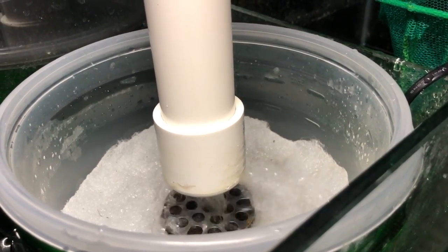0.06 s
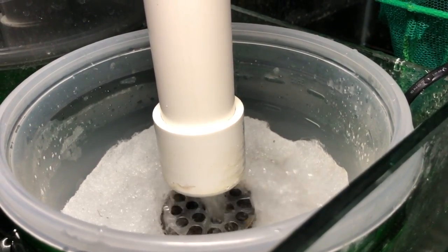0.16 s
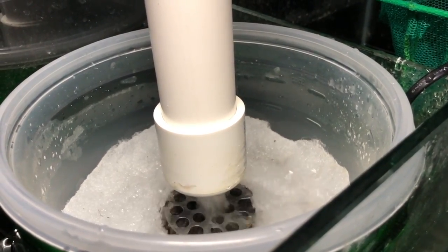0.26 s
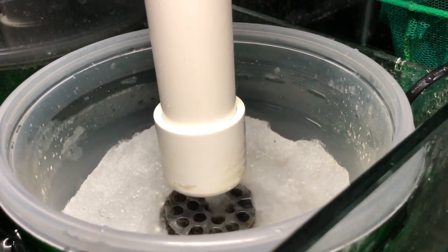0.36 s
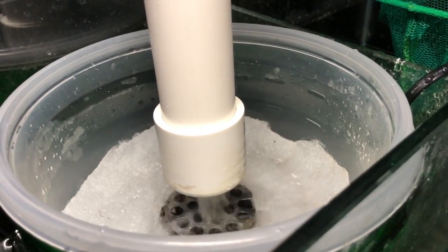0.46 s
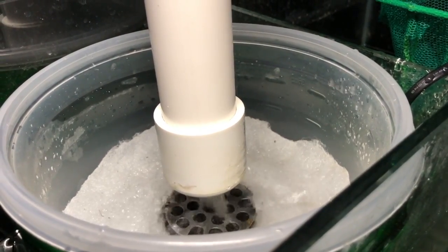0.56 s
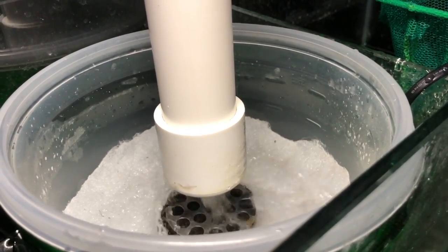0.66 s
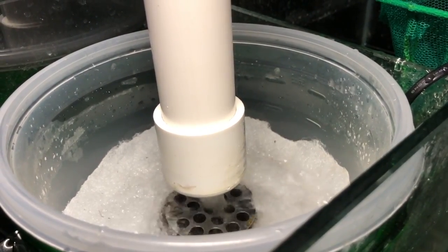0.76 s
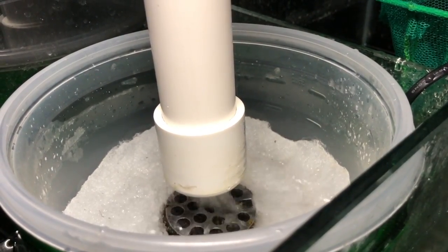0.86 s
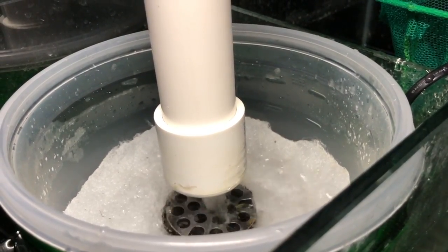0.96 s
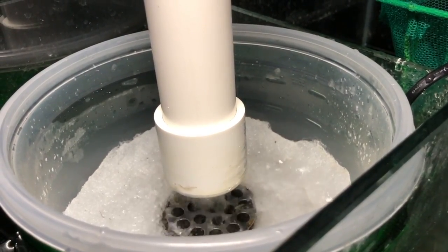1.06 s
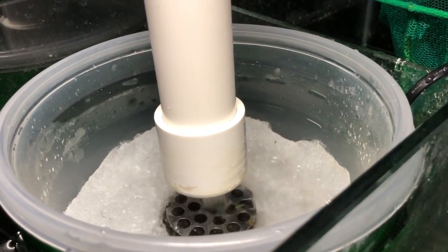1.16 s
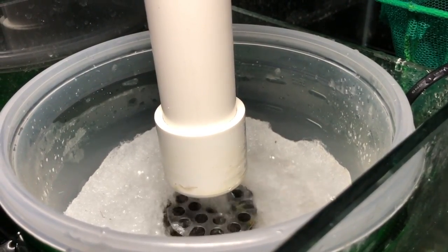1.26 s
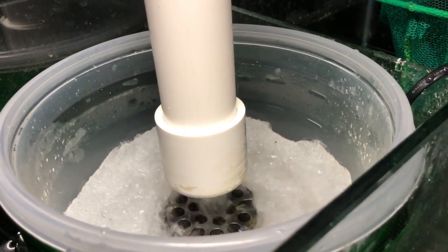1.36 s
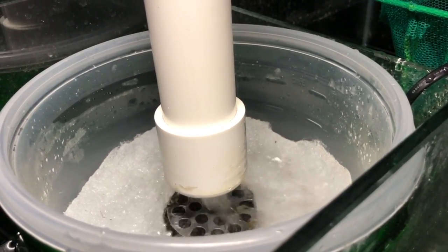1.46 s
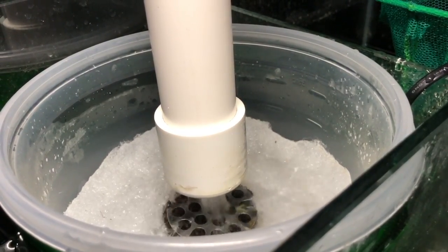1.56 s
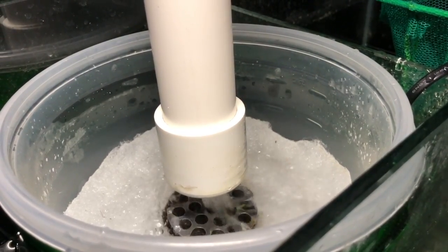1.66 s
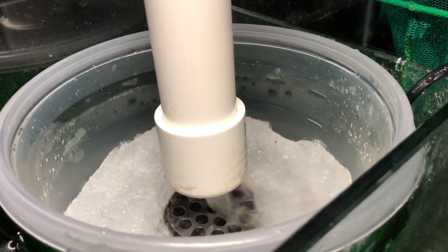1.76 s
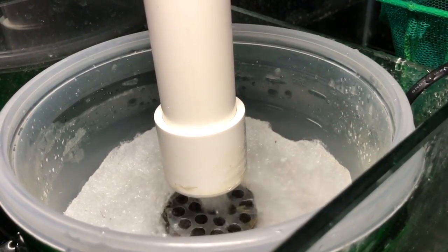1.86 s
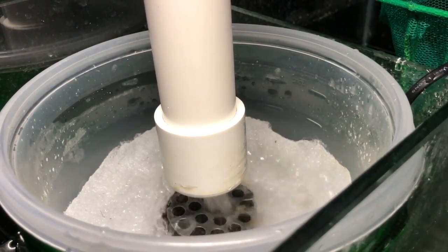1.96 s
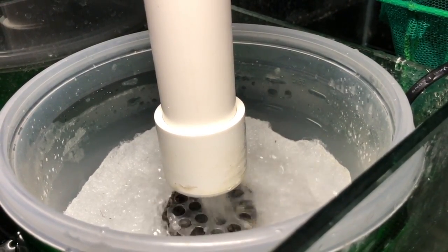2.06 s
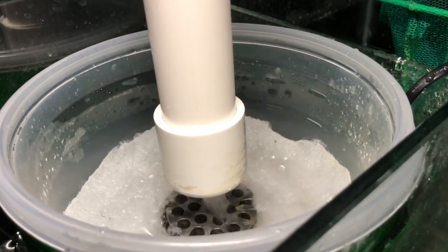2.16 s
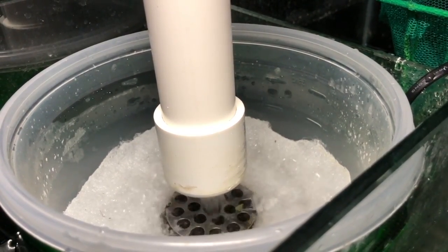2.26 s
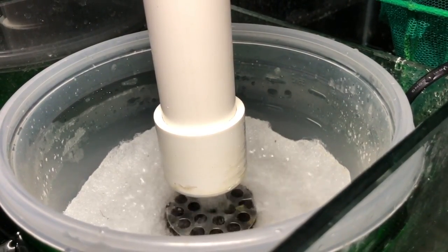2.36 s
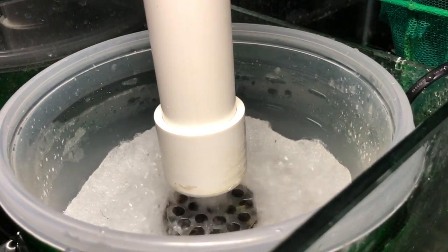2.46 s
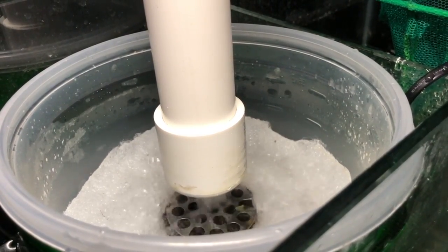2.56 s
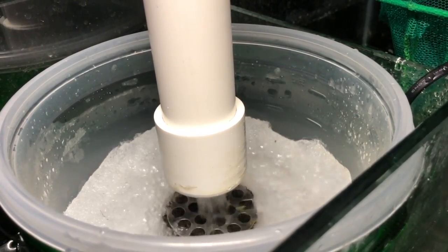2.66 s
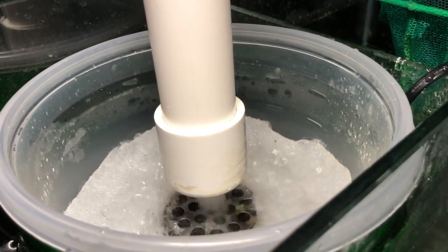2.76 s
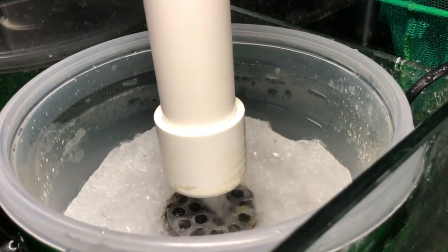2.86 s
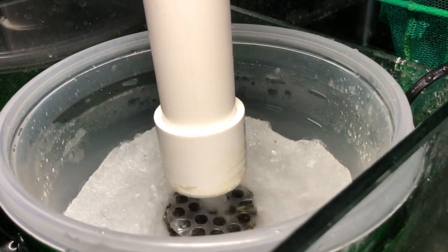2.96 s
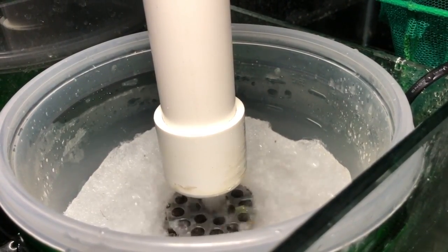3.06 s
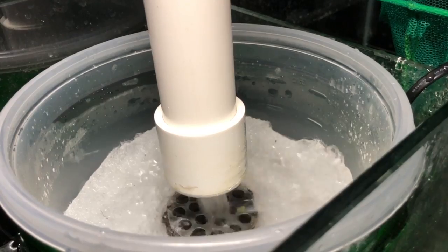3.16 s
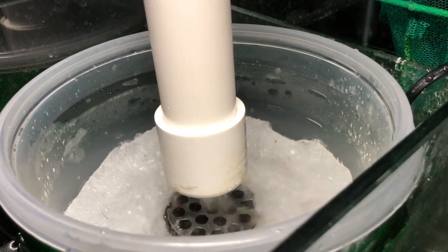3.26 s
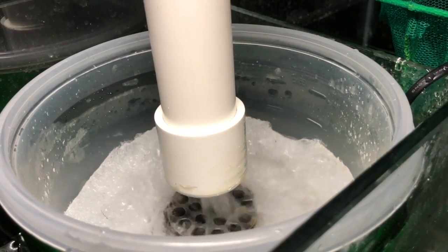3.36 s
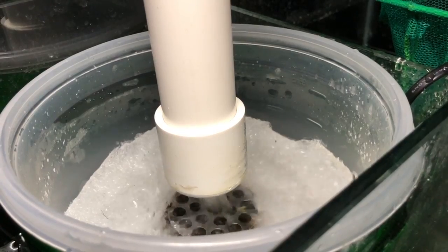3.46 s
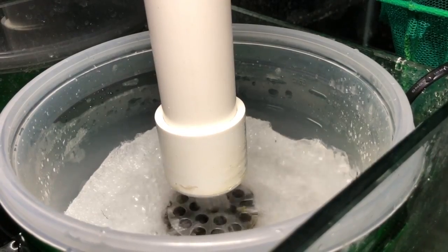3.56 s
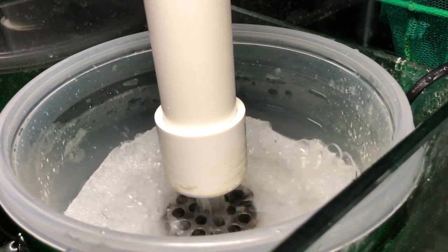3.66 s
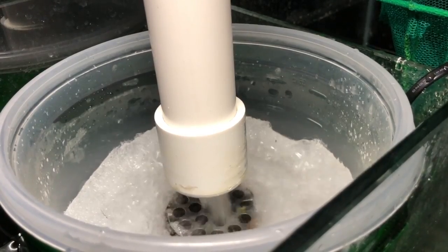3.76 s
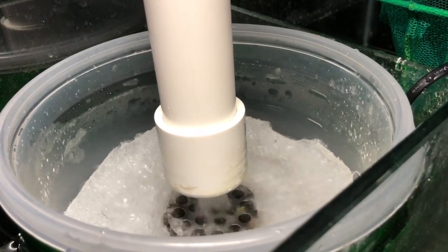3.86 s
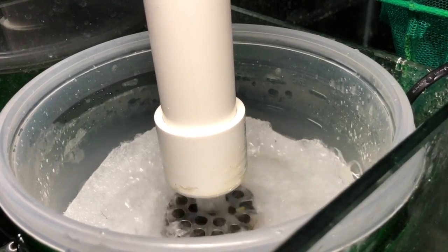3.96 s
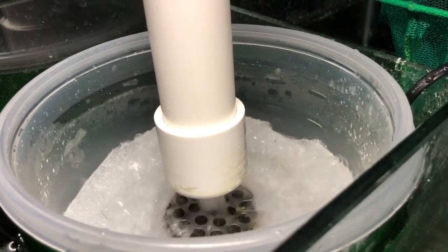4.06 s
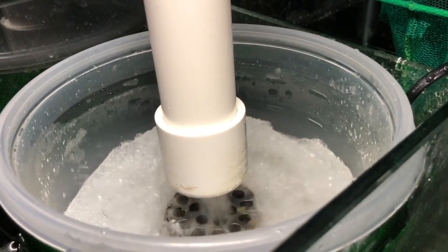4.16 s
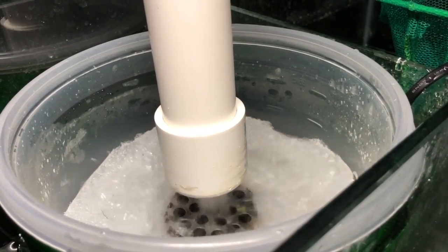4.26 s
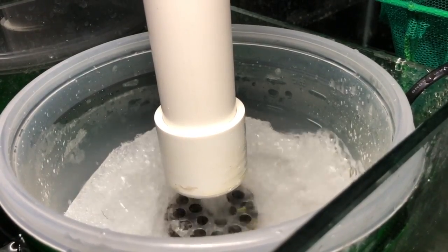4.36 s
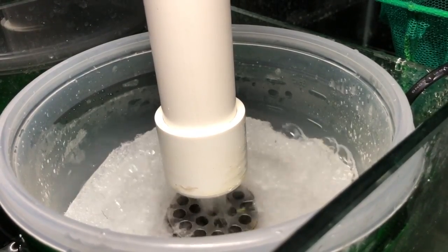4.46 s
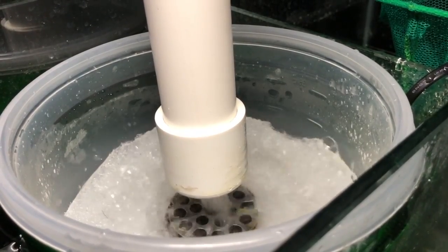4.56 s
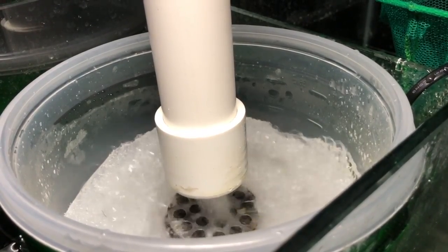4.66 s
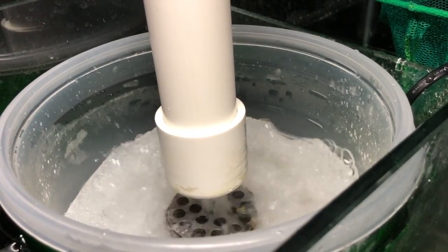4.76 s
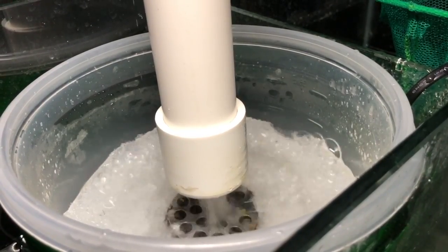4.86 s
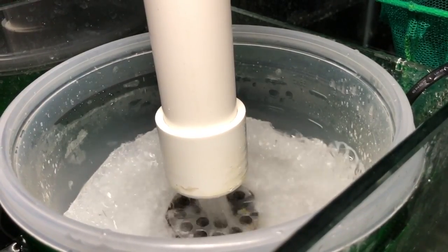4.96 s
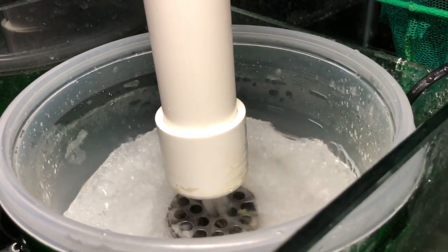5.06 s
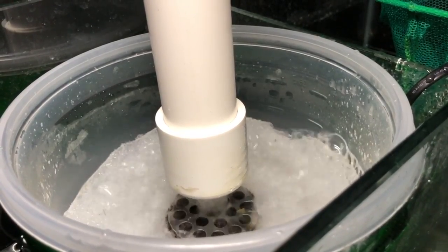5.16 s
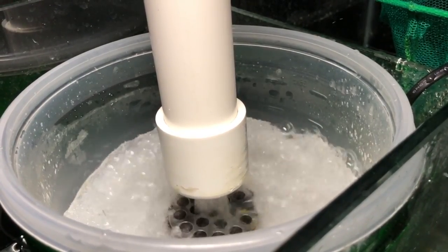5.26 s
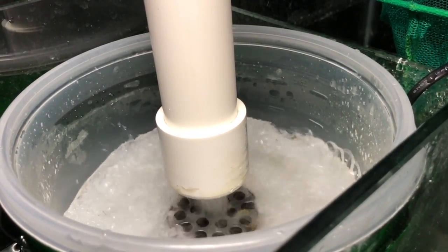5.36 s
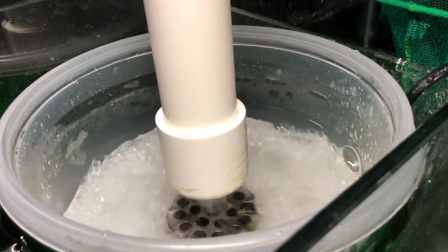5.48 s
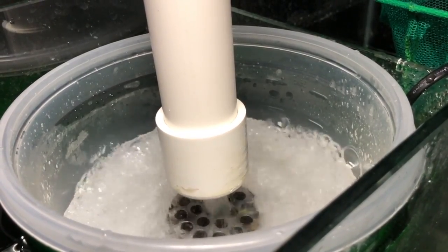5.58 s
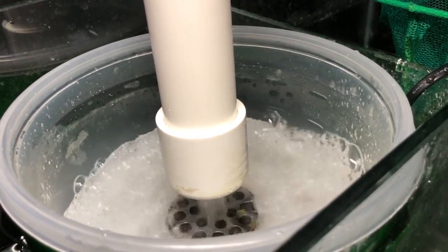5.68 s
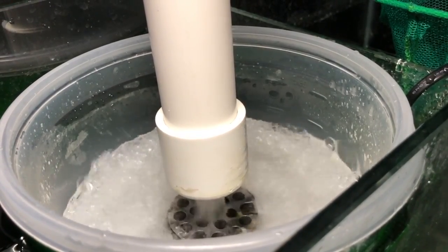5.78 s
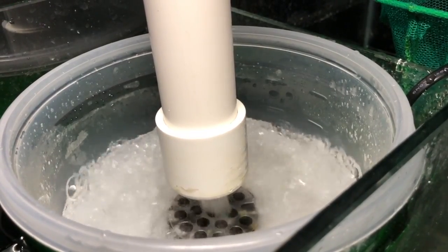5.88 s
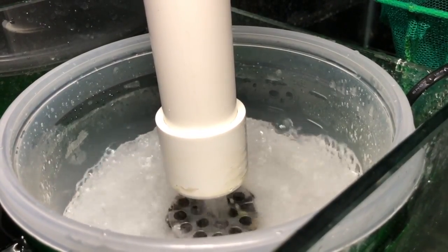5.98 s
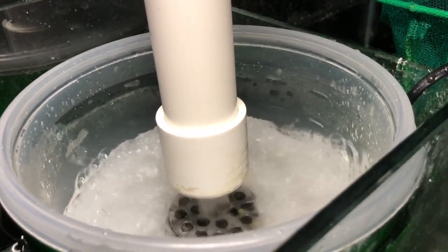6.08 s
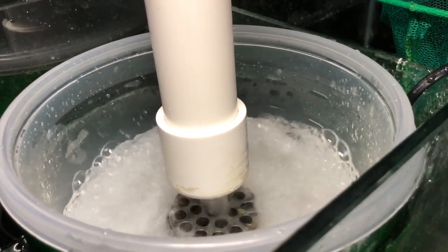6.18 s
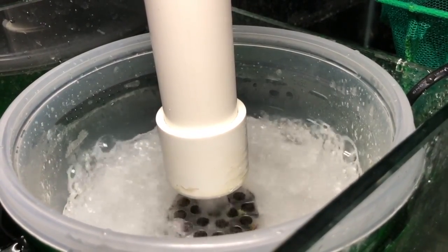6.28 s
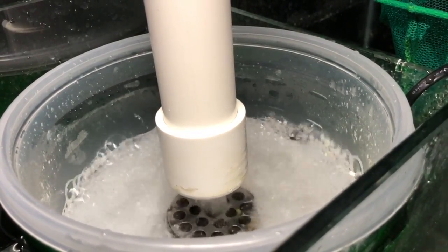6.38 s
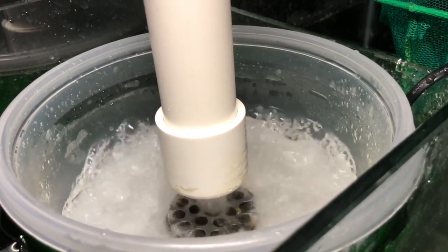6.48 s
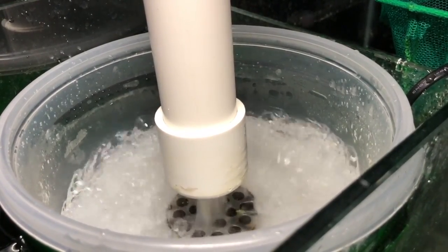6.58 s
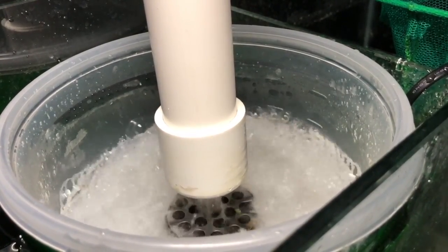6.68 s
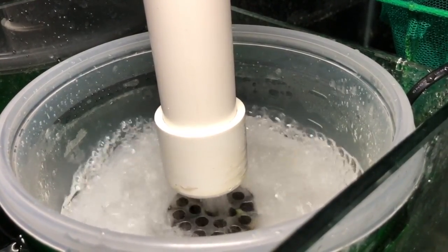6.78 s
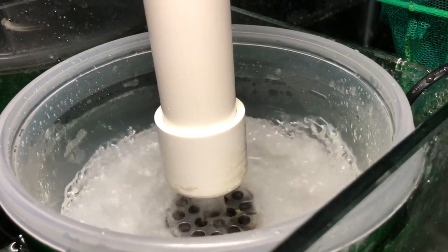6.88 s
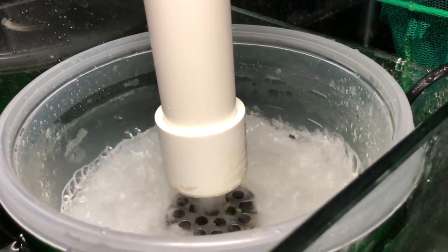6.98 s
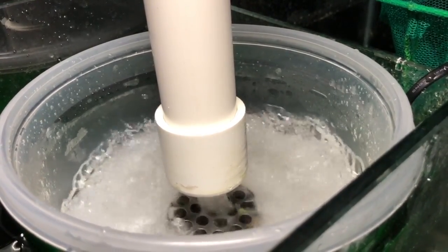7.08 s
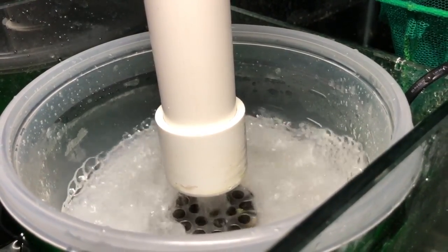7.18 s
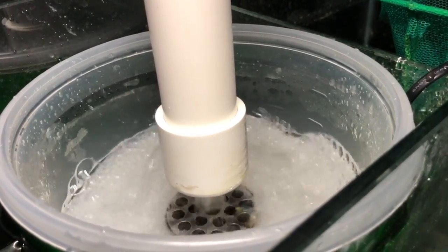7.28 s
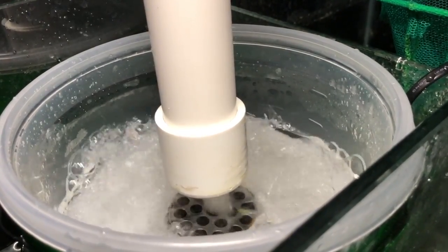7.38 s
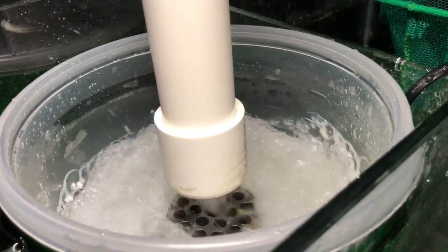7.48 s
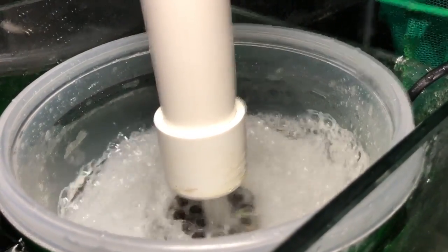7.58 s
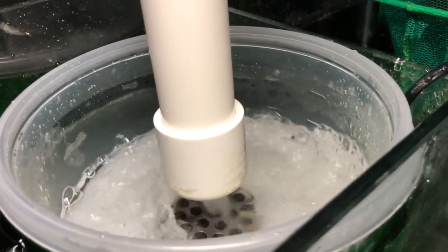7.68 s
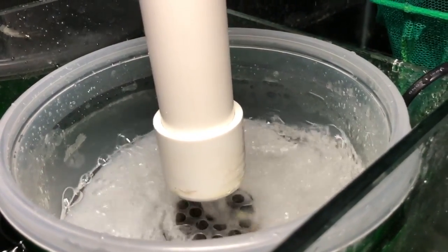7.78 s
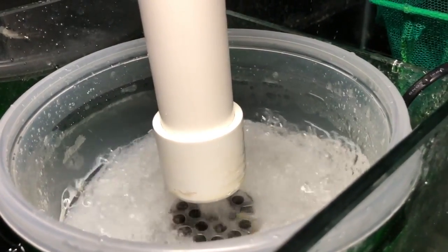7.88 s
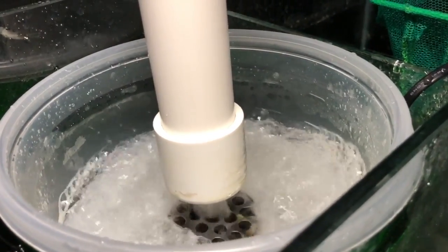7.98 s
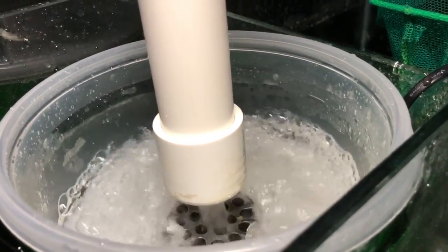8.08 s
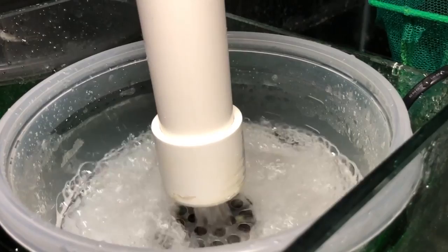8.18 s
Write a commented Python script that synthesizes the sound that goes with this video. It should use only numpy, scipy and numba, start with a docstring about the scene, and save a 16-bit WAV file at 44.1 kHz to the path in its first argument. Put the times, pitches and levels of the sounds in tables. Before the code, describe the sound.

One close microphone at a small plastic bowl of churning water. Quick irregular slugs spill from a pipe, slapping, spitting and hissing with foam. The first seconds are thin and sparse; from about three seconds the gurgling becomes fuller and nearly continuous, with many hollow plops and high plinking drops. A quiet pump rumble and faint steady whine lie underneath.

```python
"""At a foamy bowl, water falls down a wide plastic pipe in uneven slugs and breaks on a perforated plate.
Random kicks and crackling noise make each slug gurgle in the air of pipe and bowl, splash and throw spray.
Between slugs a steady flow keeps churning, trickling and hissing with foam. Loud drops and large bubbles
ring as dying sines. A pump nearby adds a noise rumble and a thin sine whine. One close microphone."""
import sys
import numpy as np
from scipy import signal
from scipy.fft import rfft, irfft, next_fast_len
from scipy.io import wavfile
from numba import njit

SR = 44100
rng = np.random.default_rng(int(sys.argv[2]) if len(sys.argv) > 2 else 0)


def unload_audio(sound):
    """Save the sound as a 16-bit wav file, at the path given as the first command line argument."""
    columns = np.transpose(np.atleast_2d(sound))
    # keep every value between -1 and 1, then stretch to whole-number steps
    steps = np.round(np.clip(columns, -1, 1) * 32767)
    wavfile.write(sys.argv[1], SR, steps.astype(np.int16))


N = 362930

# Clearest slugs of water, with levels before the layer offsets:
# start_s, rise_s, length_s, gurgle_db, splash_db
CLEAR_SLUGS = [(0.009, 0.007, 0.01, -35, -32), (0.056, 0.007, 0.021, -38, -39),
               (0.105, 0.0015, 0.023, -37.5, -40), (0.197, 0.0017, 0.0095, -27.5, -30),
               (0.265, 0.007, 0.024, -32, -28.5), (0.34, 0.0015, 0.012, -42, -33),
               (0.395, 0.007, 0.019, -39, -30), (0.466, 0.0015, 0.005, -53, -33),
               (0.487, 0.0015, 0.018, -35, -30.5), (0.537, 0.004, 0.028, -53, -30.5),
               (0.615, 0.0015, 0.032, -40, -31), (0.719, 0.004, 0.044, -38.5, -28.5),
               (0.825, 0.0015, 0.012, -41, -32), (0.868, 0.0015, 0.009, -44, -43),
               (0.896, 0.004, 0.017, -44, -32), (0.964, 0.0014, 0.022, -37.5, -29),
               (1.051, 0.007, 0.028, -42, -34), (1.121, 0.0014, 0.032, -40, -32.5),
               (1.193, 0.0015, 0.036, -42, -32.5), (1.263, 0.004, 0.015, -37, -29),
               (1.334, 0.004, 0.02, -34, -30), (1.379, 0.0015, 0.012, -32, -33),
               (1.405, 0.0015, 0.03, -35.5, -32.5), (1.465, 0.0015, 0.012, -22.5, -27),
               (1.52, 0.0015, 0.031, -29.5, -24), (1.612, 0.013, 0.027, -29, -31),
               (1.7, 0.0015, 0.021, -40, -31), (1.775, 0.0044, 0.043, -29, -28),
               (1.848, 0.0066, 0.0083, -22.5, -26), (1.884, 0.0017, 0.024, -30, -29.5),
               (1.959, 0.0015, 0.008, -36, -47), (2.066, 0.0034, 0.024, -26.5, -24),
               (2.129, 0.0016, 0.045, -22, -26), (2.197, 0.004, 0.021, -31.5, -21.5),
               (2.261, 0.012, 0.053, -45, -31.5), (2.384, 0.004, 0.016, -37, -26),
               (2.456, 0.0014, 0.04, -34.5, -28.5), (2.559, 0.0014, 0.0067, -33, -22),
               (2.589, 0.0015, 0.042, -31, -28.5), (2.649, 0.012, 0.022, -30, -26),
               (2.736, 0.004, 0.0093, -53, -36), (2.772, 0.007, 0.011, -49, -35),
               (2.834, 0.0017, 0.014, -28.5, -34), (2.864, 0.003, 0.063, -31.5, -28),
               (2.942, 0.007, 0.05, -25.5, -24), (3.061, 0.0017, 0.045, -21.5, -22.5),
               (3.129, 0.004, 0.016, -26, -32), (3.182, 0.0076, 0.007, -47, -37),
               (3.208, 0.007, 0.006, -30, -23), (3.228, 0.004, 0.018, -22, -24),
               (3.268, 0.0016, 0.022, -25.5, -21.5), (3.333, 0.0015, 0.016, -31, -31),
               (3.375, 0.007, 0.005, -23, -22), (3.426, 0.0015, 0.005, -40, -23),
               (3.46, 0.004, 0.015, -30, -23.5), (3.496, 0.0015, 0.014, -24.5, -27),
               (3.545, 0.0015, 0.015, -31.5, -28), (3.616, 0.0019, 0.03, -24, -25),
               (3.701, 0.0077, 0.035, -21, -20.5), (3.772, 0.0016, 0.014, -25.5, -28),
               (3.829, 0.0015, 0.058, -23.5, -24.5), (3.934, 0.004, 0.019, -29.5, -27),
               (3.967, 0.0015, 0.0093, -29.5, -32), (4.019, 0.004, 0.012, -28, -19.5),
               (4.035, 0.0087, 0.022, -26, -30), (4.123, 0.0059, 0.015, -24, -24),
               (4.161, 0.007, 0.037, -26, -26), (4.236, 0.012, 0.041, -26.5, -33),
               (4.327, 0.0075, 0.014, -18.5, -23), (4.374, 0.0015, 0.005, -37, -31),
               (4.397, 0.0078, 0.028, -23, -26), (4.478, 0.012, 0.045, -26, -25.5),
               (4.58, 0.004, 0.011, -41, -24), (4.613, 0.007, 0.03, -27, -26),
               (4.67, 0.0015, 0.0092, -26, -20), (4.703, 0.004, 0.018, -23, -24),
               (4.739, 0.0015, 0.029, -21.5, -20.5), (4.784, 0.0015, 0.016, -32, -27),
               (4.839, 0.004, 0.006, -26, -25), (4.877, 0.013, 0.039, -29.5, -43),
               (4.949, 0.004, 0.0097, -22, -22), (4.981, 0.0015, 0.044, -21.5, -25.5),
               (5.041, 0.0013, 0.017, -19, -28), (5.105, 0.0015, 0.0098, -22, -28),
               (5.172, 0.012, 0.033, -29.5, -27), (5.281, 0.0015, 0.017, -24.5, -21),
               (5.323, 0.0017, 0.022, -23.5, -20.5), (5.378, 0.0015, 0.039, -24, -24.5),
               (5.408, 0.0015, 0.012, -24, -23), (5.442, 0.0037, 0.03, -27, -23.5),
               (5.509, 0.0014, 0.038, -24.5, -21.5), (5.563, 0.004, 0.0078, -25, -26.5),
               (5.615, 0.0015, 0.0067, -28, -23), (5.641, 0.0036, 0.017, -24, -20.5),
               (5.697, 0.0015, 0.029, -22.5, -20), (5.75, 0.0064, 0.024, -21.5, -22),
               (5.81, 0.0044, 0.02, -23, -23), (5.873, 0.007, 0.02, -27, -24),
               (5.943, 0.0016, 0.016, -19.5, -23), (6.024, 0.0013, 0.032, -23, -20),
               (6.095, 0.007, 0.02, -19.5, -26), (6.145, 0.0076, 0.011, -22, -21.5),
               (6.203, 0.0015, 0.013, -19, -20), (6.29, 0.0015, 0.0038, -39, -24.5),
               (6.318, 0.016, 0.022, -24.5, -19.5), (6.379, 0.004, 0.009, -25, -23.5),
               (6.493, 0.02, 0.069, -18, -21.5), (6.581, 0.004, 0.013, -27, -29),
               (6.613, 0.007, 0.0098, -25.5, -25), (6.658, 0.0043, 0.0092, -22, -27),
               (6.686, 0.0015, 0.013, -38, -26), (6.73, 0.013, 0.021, -23.5, -24),
               (6.79, 0.0062, 0.055, -27, -42), (6.947, 0.0015, 0.013, -25, -23.5),
               (6.995, 0.0015, 0.044, -28, -27), (7.094, 0.007, 0.041, -26.5, -26),
               (7.187, 0.004, 0.062, -20, -24), (7.318, 0.004, 0.012, -25.5, -18.5),
               (7.343, 0.005, 0.012, -23, -20.5), (7.386, 0.0015, 0.04, -20, -21),
               (7.465, 0.014, 0.048, -23.5, -25.5), (7.525, 0.0015, 0.006, -31, -21),
               (7.59, 0.004, 0.028, -27, -31), (7.625, 0.0081, 0.024, -15, -24.5),
               (7.664, 0.0013, 0.019, -19, -29.5), (7.717, 0.0018, 0.029, -20, -25.5),
               (7.754, 0.007, 0.02, -18, -21.5), (7.851, 0.0015, 0.04, -27, -28),
               (7.957, 0.0017, 0.059, -28.5, -25.5), (8.092, 0.0015, 0.045, -39, -29)]
# Loud single drops, each ringing a small bubble: start_s, level_db, pitch_hz (at the start of the ring)
LOUD_DROPS = [(0.341, -15.5, 4340), (0.616, -35, 4380), (1.1273, -16, 5800), (1.5243, -21, 3250),
              (1.7705, -11, 8500), (1.8843, -7, 7640), (2.135, -19, 3360), (2.207, -15, 3720),
              (2.5636, -12, 7500), (2.832, -27, 3820), (3.058, -13, 4370), (3.152, -13, 5800),
              (3.4296, -29, 3120), (3.7045, -22, 4450), (3.949, -10, 4460), (4.0194, -16, 3100),
              (4.672, -18, 4070), (5.0493, -6.5, 7540), (5.1118, -20, 4910), (5.1497, -17, 5000),
              (5.2934, -11, 4940), (5.3244, -24, 3300), (5.699, -9.5, 4300), (6.1964, -14, 4960),
              (6.21, -12, 4300), (6.2913, -11.5, 5050), (6.563, -13, 5100), (6.7575, -9, 7600),
              (6.8182, -8.5, 4770), (7.3187, -22, 4500), (7.3936, -17, 4920), (7.5268, -15, 4710),
              (7.595, -14, 4640), (8.093, -25, 4980)]
# Large bubbles that ring out of the gurgle: start_s, level_db, pitch_hz (at the start of the ring)
LARGE_BUBBLES = [(0.2035, -30, 1170), (0.618, -24.5, 1810), (1.3817, -22, 1780), (1.4696, -19, 1140),
                 (1.5219, -23, 1120), (1.702, -24, 1160), (1.7838, -17, 1890), (1.9618, -18, 1550),
                 (2.0678, -12, 1150), (2.1386, -20, 1190), (2.389, -22, 1830), (2.4544, -18.5, 2170),
                 (2.594, -29, 1140), (2.835, -19, 1800), (3.204, -17, 1870), (3.2697, -16, 1940),
                 (3.3373, -14.5, 1710), (3.499, -13.5, 1190), (3.5447, -15.5, 1730), (3.5678, -16.5, 1750),
                 (3.614, -21, 2190), (3.703, -19, 1730), (3.7716, -14.5, 1140), (3.83, -18, 1850),
                 (3.8642, -12, 1810), (4.1634, -15, 1850), (4.4785, -22, 1800), (4.561, -28, 1960),
                 (4.6703, -21, 2290), (4.831, -14.5, 1770), (4.9558, -9.5, 1140), (4.9816, -14, 1630),
                 (5.04, -12, 1800), (5.1066, -13.5, 1750), (5.3763, -14, 1900), (5.453, -20, 1900),
                 (5.517, -25, 1090), (5.6186, -14, 1880), (5.8172, -12, 1120), (5.914, -22, 1950),
                 (5.946, -14, 1810), (6.026, -11, 1620), (6.2086, -15, 1120), (6.3039, -18, 1830),
                 (6.392, -10, 1750), (6.4794, -25, 2280), (6.5327, -10, 1800), (6.618, -19, 1800),
                 (6.7382, -14, 2150), (6.8099, -11.5, 1730), (6.9252, -35, 2170), (6.9483, -14.5, 1990),
                 (6.997, -20, 2000), (7.189, -24, 1110), (7.209, -16, 1610), (7.311, -21, 1780),
                 (7.3502, -12, 1160), (7.3896, -13.5, 1840), (7.4213, -18, 1590), (7.5878, -23, 1800),
                 (7.715, -13.5, 1140), (7.8516, -15, 1930), (7.9696, -17.5, 1940), (8.085, -20.5, 2220)]
# Steady flow between slugs, before each layer's share: time_s, deep_churn_db, trickle_db, foam_hiss_db
STEADY_FLOW = [(0.0, -53.5, -41, -31), (1.01, -50.5, -47, -34.5), (2.04, -36, -33.5, -28.5),
               (2.29, -47.5, -47, -33), (2.84, -43.5, -37.5, -26.5), (3.09, -32, -32.5, -27),
               (3.78, -36, -35.5, -26.5), (4.26, -26, -27, -22.5), (4.58, -34.5, -33, -24),
               (4.9, -29.5, -26, -24), (5.13, -33.5, -32.5, -24.5), (5.89, -32, -28.5, -25),
               (6.17, -35, -31.5, -24), (6.97, -36.5, -30.5, -24), (7.45, -43, -36, -27.5),
               (7.56, -34, -28.5, -23.5), (7.88, -56, -37, -26), (8.23, -43, -32.5, -26.5)]
# Resonances of the air in pipe and bowl, relative levels: pitch_hz, width_hz, level_db
AIR_RESONANCES = [(275, 10.3, -7.5), (321.6, 28, -10.5), (408, 17, -10), (468, 16.7, 3), (518, 34, 6),
                  (569, 52, -4.5), (627, 22, -15), (715, 27, -8), (824.4, 32, 1), (944, 21, -1.5),
                  (1044, 22, -14.5), (1148, 92, -4.5), (1192, 97, 1), (1413, 62, -7), (1590, 147, 2),
                  (1803, 62, 4.5), (1912, 150, 3), (2034, 110, -11.5), (2210, 37, 1), (2219, 34, 1),
                  (2594, 16.3, 6), (2720, 16, -13.5), (2830, 36, -4), (3079, 62, -5.5), (3139, 17.6, -1),
                  (3407, 24, -4.5), (3718, 276, -7.5), (4078, 89, -5), (4362, 67, -3), (4760, 214, -8.5)]
# Edges of the gulp, plop and splash bands: edge_hz
BAND_EDGES_HZ = 210, 890, 2750, 5600
# Tone colour of the spray in open air, relative levels: pitch_hz, level_db (per Hz)
SPRAY_COLOUR = [(3180, -32), (5400, -8), (6230, -5), (6630, -4), (7000, -5), (7580, -2.5), (8140, -2),
                (9110, -6), (10700, -5.5), (13900, -12.5), (15700, -11.5)]
# Tone colour of the pump rumble and the bowl thump, relative levels: pitch_hz, level_db (per Hz)
RUMBLE_COLOUR = [(24, -37), (40, -16.5), (103, 4), (127, 0), (215, -26.5), (307, -12.5), (364, -24.5),
                 (519, -20), (569, -26), (634, -16), (728, -25.5), (824, -14.5), (992, -22), (1160, -22),
                 (1600, -21.5), (2080, -50), (3520, -120)]
# Reflections from the bowl walls: delay_ms, gain (plain factor; a minus flips the wave)
WALL_REFLECTIONS = [(1.7, -.13), (2.9, .13), (4.3, .11), (6.1, -.09)]

RUMBLE_DB, WHINE_HZ, WHINE_DB = -37.5, 572, -49.5
GULP_DB, PLOP_DB, SPLASH_DB, SPRAY_DB = -1, -3.5, -2, -2.5  # each layer against its slug level
DEEP_SHARE = 0.58  # how far the gulps follow the depth of the churn
SCATTER_DB = 1.8  # random spread of level between the layers of one slug
# lesser slugs: rise, middle length, level against the flow and its random spread
SMALL_RISE_S, SMALL_LENGTH_S, SMALL_DB, SMALL_SCATTER_DB = 0.0017, 0.010, 2.5, 0
SPRAY_SHARE = 0.68  # spray rises above the foam hiss less than the splash does
MIC_LOW_HZ, TOP_HZ = 48, 15710

FFT_SIZE = next_fast_len(N + SR)
HZ = np.fft.rfftfreq(FFT_SIZE, 1 / SR)[1:]  # without 0 Hz
TIME = np.arange(N) / SR


def undb(db):
    """Turn a level in dB into a plain gain."""
    return 10 ** (np.asarray(db) / 20)


def through(x, response):
    """Filter by a frequency response scaled so that white noise keeps its level."""
    response = response / np.sqrt(np.mean(np.abs(response) ** 2))
    response = np.append(0, response)
    return irfft(rfft(x, FFT_SIZE) * response, FFT_SIZE)[:N]


def colour(points):
    """Filter response through (Hz, dB) points that never sounds before its input."""
    hz, db = np.transpose(points)
    level_db = np.interp(np.log(np.append(1, HZ)), np.log(hz), db)
    # folding the cepstrum of the log gain gives the phase that acts soonest
    cepstrum = irfft(np.log(undb(level_db)), FFT_SIZE)
    cepstrum[1:FFT_SIZE // 2] *= 2
    cepstrum[FFT_SIZE // 2 + 1:] = 0
    return np.exp(rfft(cepstrum))[1:]


def noise_sizes(spread_db, limit, count=N):
    """Random gains: many small, few large, with a firm limit."""
    return undb(spread_db * np.minimum(rng.exponential(size=count), limit))


def crackle(spread_db):
    """Dense tiny impacts: noise with uneven but limited sizes, rms 1."""
    x = rng.standard_normal(N) * noise_sizes(spread_db, limit=5)
    return x / np.std(x)


def patter(rate, spread_db, fade_s, bed):
    """Gain that jumps at random small impacts (rate per second) and fades after each; mean power 1."""
    hit = rng.random(N) < rate / SR
    keep = np.exp(-1 / (fade_s * SR))
    power = signal.lfilter([1], [1, -keep], hit * noise_sizes(2 * spread_db, limit=3))
    # the steady bed fills the gaps between impacts
    power = power / np.mean(power) + bed
    return np.sqrt(power / np.mean(power))


def pops(rate, spread_db):
    """Single pressure kicks of collapsing air pockets, sparse (rate per second); rms 1."""
    hit = rng.random(N) < rate / SR
    sign = rng.choice([-1., 1.], N)
    x = hit * sign * noise_sizes(spread_db, limit=2.5)
    return x / np.std(x)


@njit
def ring(count, start, hz, cycles, size, glide, rate):
    """Dying sines, down to 1/e after the given cycles, whose pitch glides up as they fade."""
    out = np.zeros(count)
    for k in range(len(start)):
        step = 2 * np.pi * hz[k] / rate
        fade = np.exp(-hz[k] / (cycles[k] * rate))
        phase, gain, i = 0., size[k], start[k]
        while gain > size[k] / 300 and i < count:
            out[i] += gain * np.sin(phase)
            phase += step
            step *= 1 + glide * (1 - fade)
            gain *= fade
            i += 1
    return out


def rings(table, cycles, glide):
    """One bubble ring for each row of start, level and pitch."""
    s, db, hz = np.transpose(table)
    start = (s * SR).astype(np.int64)
    return ring(N, start, hz, np.full(len(s), cycles), undb(db), glide, 1. * SR)


def bubbles(count, low_hz, high_hz, cycles, spread_db, glide):
    """Trapped air pockets of random size ringing at random moments; rms 1."""
    start = (rng.random(count) * N).astype(np.int64)
    hz = low_hz * (high_hz / low_hz) ** rng.random(count)
    size = noise_sizes(spread_db, limit=3, count=count)
    x = ring(N, start, hz, np.full(count, cycles), size, glide, 1. * SR)
    return x / np.std(x)


def pump():
    """Rumble and hum through the plumbing and a thin whine that wavers a little in level."""
    rumble = undb(RUMBLE_DB) * through(rng.standard_normal(N), colour(RUMBLE_COLOUR))
    # a new random whine level 12 times a second, joined by straight lines
    waver = np.interp(TIME * 12, np.arange(120), undb(2 * rng.standard_normal(120)))
    whine = np.sqrt(2) * undb(WHINE_DB) * waver * np.sin(2 * np.pi * WHINE_HZ * TIME)
    return rumble + whine


def drops():
    """Loud drops ring small bubbles; large bubbles plop lower and ring for fewer cycles."""
    small = rings(LOUD_DROPS, cycles=8., glide=.03)
    large = rings(LARGE_BUBBLES, cycles=6., glide=.04)
    return small + large


def slugs(count):
    """Clear slugs and random lesser ones: start, rise, length (s), then gulp, plop, splash, spray (dB)."""
    s, churn, trickle, foam = np.transpose(STEADY_FLOW)
    # lesser slugs take their levels from the flow at that moment
    when = rng.random(count) * N / SR
    small_length = SMALL_LENGTH_S * (.5 + rng.random(count))
    small_db = SMALL_DB + SMALL_SCATTER_DB * (2 * rng.random(count) - 1)
    small = [when, np.full(count, SMALL_RISE_S), small_length,
             np.interp(when, s, trickle) + small_db, np.interp(when, s, foam) + small_db]
    start, rise, length, gurgle, splash = np.hstack([np.transpose(CLEAR_SLUGS), small])
    deep = DEEP_SHARE * np.interp(start, s, churn - trickle)
    # where the splash tops the foam hiss, the spray rises less
    spray = splash + (1 - SPRAY_SHARE) * np.minimum(np.interp(start, s, foam) - splash, 0)
    low, high = SCATTER_DB * rng.standard_normal((2, len(start)))
    return np.transpose([start, rise, length,
                         gurgle + deep + GULP_DB + low,
                         gurgle + PLOP_DB - low / 2,
                         splash + SPLASH_DB - high / 2,
                         spray + SPRAY_DB + high])


def surges(rows, column, slap, sag_s, tail_s):
    """Power of all slugs: a rise, a slap as the front lands, a sagging hold, then a dying tail."""
    power = np.zeros(N)
    for row in rows:
        start, rise, length = int(row[0] * SR), max(row[1], .001), row[2]
        t = np.arange(min(N - start, SR // 4)) / SR
        shape = np.minimum(t / rise, 1) ** 2
        shape *= np.exp(-t / sag_s - np.maximum(t - length, 0) / tail_s)
        # the more sudden the front, the harder the slap
        shape *= 1 + slap * .002 / rise * np.exp(-np.maximum(t - rise, 0) / .004)
        power[start:start + len(t)] += undb(2 * row[column]) * shape
    return power


def knocks(gain_db):
    """Each large bubble also kicks the air in the pipe once."""
    s, db, _ = np.transpose(LARGE_BUBBLES)
    x = np.zeros(N)
    x[(s * SR).astype(int)] = undb(db + gain_db)
    return x


def cavity(band):
    """Summed air resonances within one band; neighbours partly cancel between their peaks."""
    modes = 0
    for hz, width, db in AIR_RESONANCES:
        modes = modes + undb(db) / (1 + 1j * (HZ ** 2 - hz ** 2) / (HZ * width))
    edges = signal.butter(4, BAND_EDGES_HZ[band:band + 2], "band", fs=SR, output="sos")
    return modes * signal.sosfreqz(edges, HZ, fs=SR)[1]


def open_air():
    """Tone colour of the spray with its reflections from the bowl walls."""
    # foam on the walls swallows the highest reflections
    dull = 1 / (1 + 1j * HZ / 9000)
    echoes = sum(gain * np.exp(-2j * np.pi * HZ * ms / 1000) for ms, gain in WALL_REFLECTIONS)
    return colour(SPRAY_COLOUR) * (1 + dull * echoes)


def spray_drive(rows, foam):
    """Fine drops and tiny ringing bubbles follow the slugs and the foam hiss."""
    mist = bubbles(count=9000, low_hz=5154.0, high_hz=15620.0, cycles=8.4, spread_db=2.5, glide=0.035)
    ticks = patter(rate=140.0, spread_db=4.0, fade_s=0.0048, bed=1.7)
    strength = np.sqrt(surges(rows, column=6, slap=0.62, sag_s=0.3, tail_s=0.0073) + 0.4 * foam)
    return strength * (0.65 * ticks * crackle(2.1) + undb(-8.0) * mist)


def splash_drive(rows, foam):
    """Spitting impacts and fizzing bubbles follow the slugs and the foam hiss."""
    fizz = bubbles(count=5000, low_hz=2635.0, high_hz=6320.0, cycles=6.4, spread_db=5.5, glide=0.04)
    spits = patter(rate=200.0, spread_db=-0.5, fade_s=0.0063, bed=1.0)
    strength = np.sqrt(surges(rows, column=5, slap=0.38, sag_s=0.095, tail_s=0.0048) + 0.29 * foam)
    return strength * spits * (0.81 * crackle(2.9) + undb(-13.5) * fizz)


def plop_drive(rows, trickle, lumps, kicks):
    """Lumpy water, kicks and ringing air pockets that give each plop its own short pitch."""
    pockets = bubbles(count=3000, low_hz=900., high_hz=3000., cycles=6., spread_db=3., glide=.08)
    strength = np.sqrt(surges(rows, column=4, slap=0.62, sag_s=0.17, tail_s=0.0021) + 0.42 * trickle)
    rough = lumps * (0.56 * crackle(1.5) + undb(-12.5) * pockets)
    return strength * (rough + kicks) + knocks(gain_db=3.5)


def gulp_drive(rows, churn, lumps, kicks):
    """Lumpy water and kicks push the deepest air along with the slugs and the churn."""
    strength = np.sqrt(surges(rows, column=3, slap=0.79, sag_s=0.056, tail_s=0.0017) + 0.3 * churn)
    return strength * (0.6 * lumps * crackle(0.86) + kicks) + knocks(gain_db=10.0)


def water():
    """Slugs and steady flow excite the cavity (gulp, plop, splash) and the open air (spray)."""
    s, *flow_db = np.transpose(STEADY_FLOW)
    churn, trickle, foam = (undb(2 * np.interp(TIME, s, db)) for db in flow_db)  # as power
    rows = slugs(count=35)
    # the same lumps and kicks drive the low and the middle resonances at once
    lumps = patter(rate=120., spread_db=3.5, fade_s=0.0036, bed=0.11)
    kicks = undb(-3) * pops(rate=260., spread_db=2.5)
    spray = through(spray_drive(rows, foam), open_air())
    splash = through(splash_drive(rows, foam), cavity(band=2))
    plop = through(plop_drive(rows, trickle, lumps, kicks), cavity(band=1))
    gulp_push = gulp_drive(rows, churn, lumps, kicks)
    gulp = through(gulp_push, cavity(band=0))
    # the gulps also thump the bowl
    thump = undb(-10.0) * through(gulp_push, colour(RUMBLE_COLOUR))
    return spray + splash + plop + gulp + thump


def scene():
    """Pump, drops and water at one microphone."""
    return (pump() + drops() + water())[None]


def record(dry):
    """The microphone loses the lowest bass, and the recorder cuts the top steeply."""
    bass_cut = signal.butter(3, MIC_LOW_HZ, "high", fs=SR, output="sos")
    top_cut = signal.ellip(12, .3, 80, TOP_HZ, fs=SR, output="sos")
    return signal.sosfilt(top_cut, signal.sosfilt(bass_cut, dry))


dry = scene()
out = record(dry)
unload_audio(out)
```